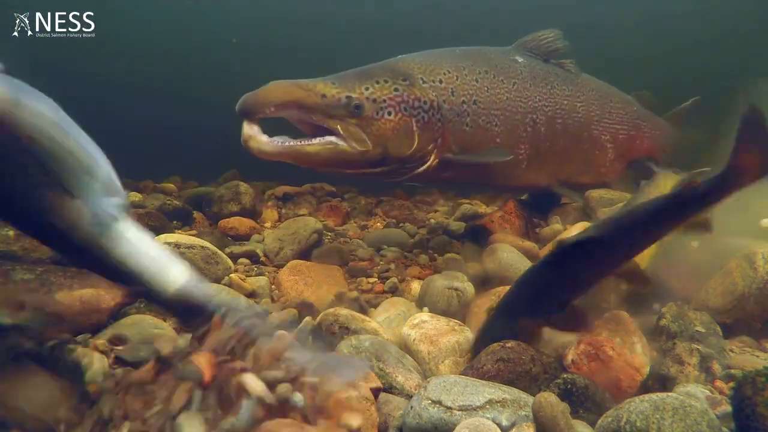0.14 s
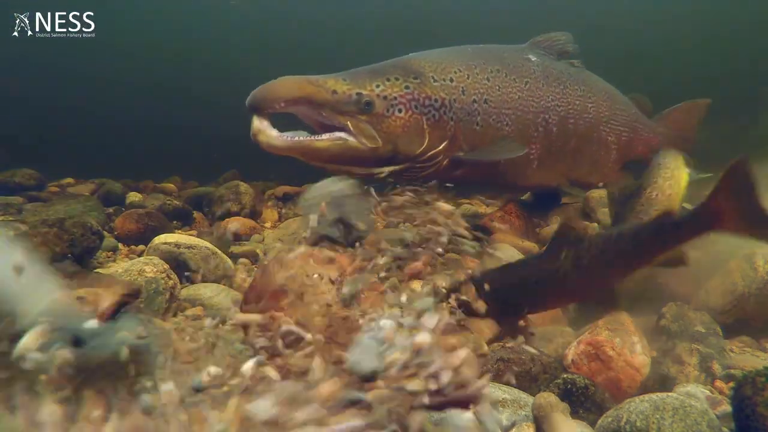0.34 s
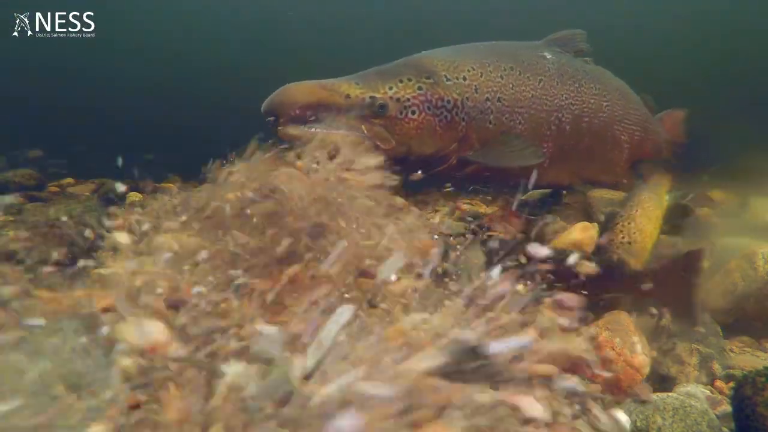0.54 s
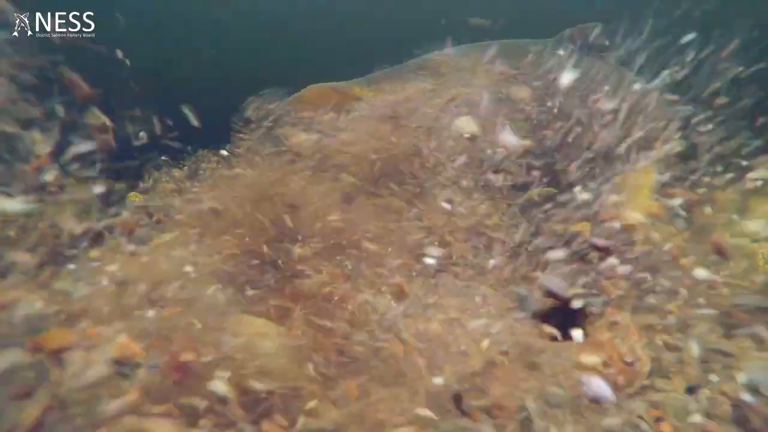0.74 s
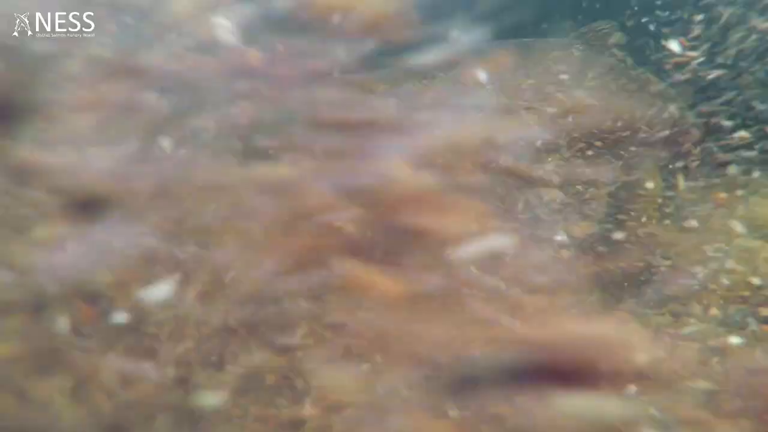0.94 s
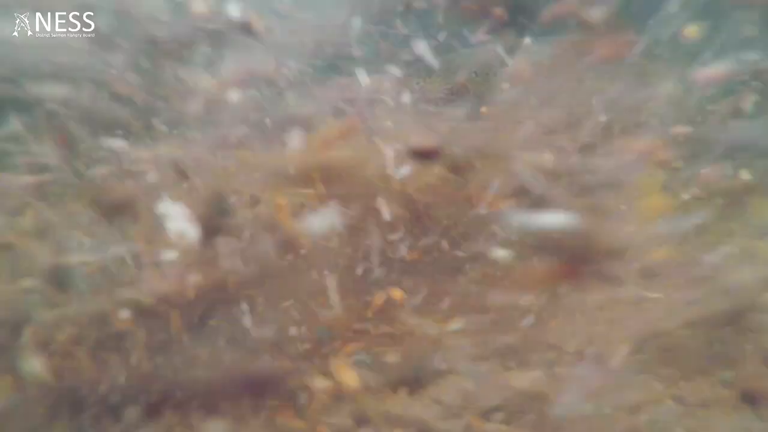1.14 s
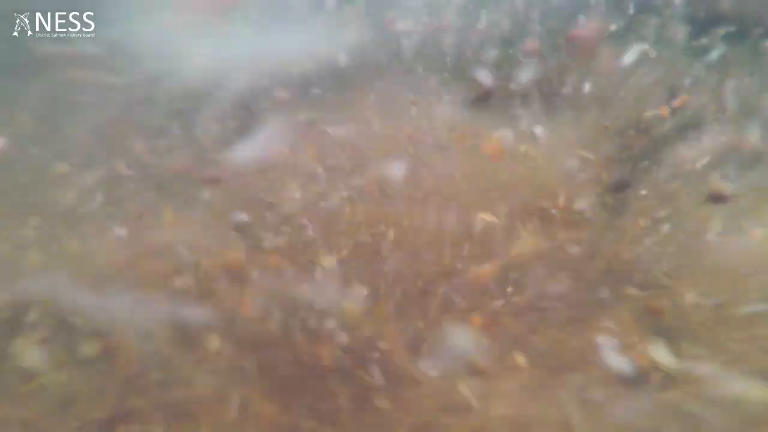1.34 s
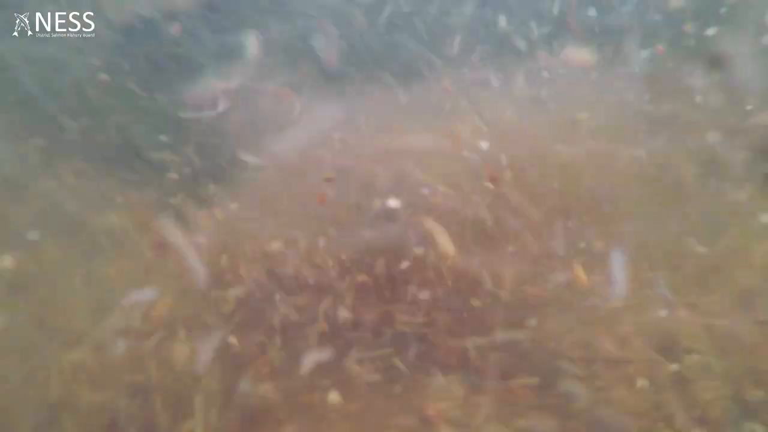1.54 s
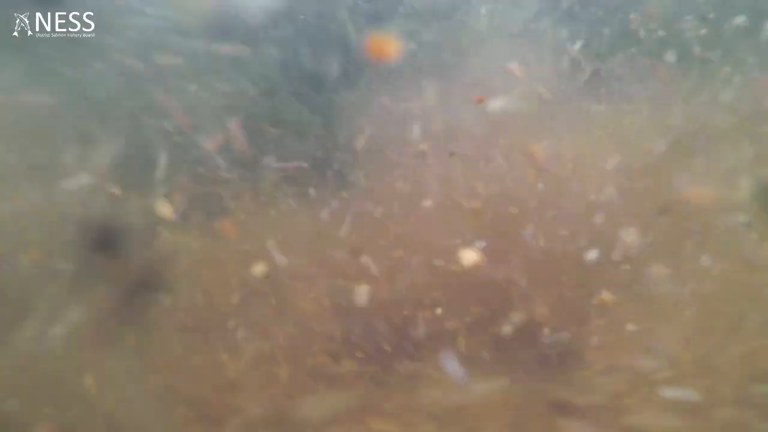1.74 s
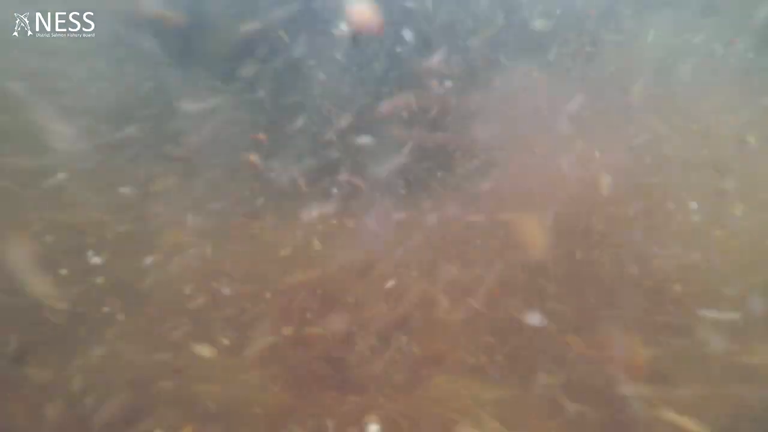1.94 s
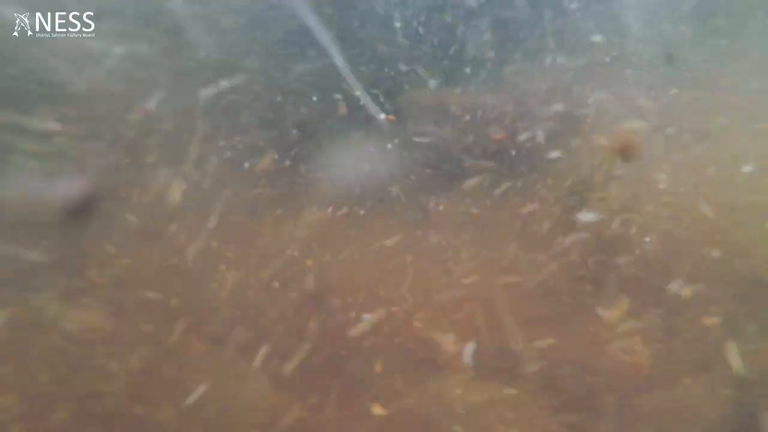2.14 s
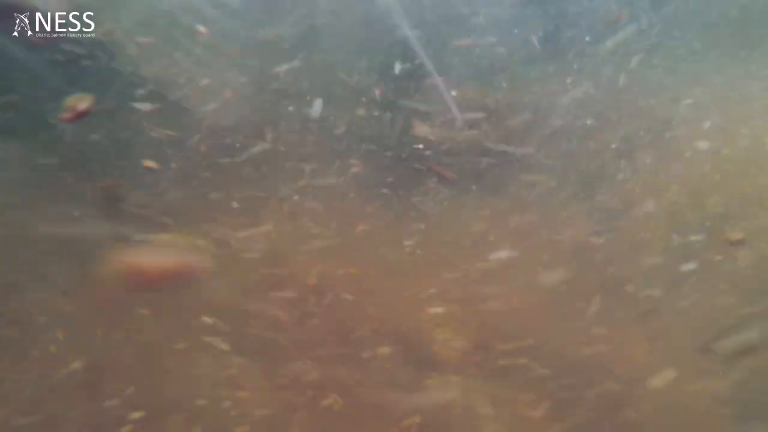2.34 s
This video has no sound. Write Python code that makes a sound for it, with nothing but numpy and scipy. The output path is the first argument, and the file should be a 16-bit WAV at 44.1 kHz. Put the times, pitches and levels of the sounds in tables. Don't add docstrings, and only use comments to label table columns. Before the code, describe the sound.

Stones and grit pelt a small plastic camera case on a riverbed, very close and dry; sharp clicks, hollow knocks and hissing sand build quickly, stay busy, then settle into scattered small taps in murky water.

```python
import sys
import numpy as np
from scipy import signal
from scipy.fft import rfft, irfft, dct
from scipy.io import wavfile
from scipy.ndimage import map_coordinates

SR = 44100
rng = np.random.default_rng(int(sys.argv[2]) if len(sys.argv) > 2 else 0)


def boost_factor(decibels):
    exponent = np.asarray(decibels, float) / 20
    return 10 ** exponent


def output_pcm(signal):
    pcm = np.clip(np.atleast_2d(signal).T, -1, 1) * 32767
    wavfile.write(sys.argv[1], SR, np.round(pcm).astype(np.int16))


N = 105840


def unit(x):
    return x / np.sqrt(np.mean(x ** 2) + 1e-20)


def wobble(knots_per_s):
    knots = rng.standard_normal(int(N * knots_per_s / SR) + 4)
    return map_coordinates(knots, [np.arange(N) * knots_per_s / SR])


def coloured(spectrum):
    f, db = np.transpose(spectrum)
    hz = np.fft.rfftfreq(N, 1 / SR)
    gain = boost_factor(np.interp(np.log(hz + 1), np.log(f + 1), db, right=-120))
    return unit(irfft(rfft(rng.standard_normal(N)) * gain, N))


def placed(times_s, sounds):
    at = np.round(np.asarray(times_s) * SR).astype(int)[:, None] + np.arange(sounds.shape[1])
    return np.bincount(at.ravel(), sounds.ravel(), N + SR)[:N]


def band(x, edges_hz):
    return signal.sosfilt(signal.butter(3, edges_hz, "band", fs=SR, output="sos"), x)


T60_AT_3K_S, T60_SLOPE = .011, .62


def fade(hz, t):
    return -60 * t / T60_AT_3K_S * (hz / 3000) ** T60_SLOPE


SPOT_DB, DETUNE = 3, .025
CRACK, CRACK_S = 3, .0004
SOFT_RISE_S = .00025


def rings(modes, hard, rise_s, size, tilt_db=0):
    t = np.arange(size) / SR
    luck = rng.standard_normal((len(hard), len(modes), 2))
    scatter_db = SPOT_DB * (2.5 - hard / 2)
    out = 0
    for k, (hz, db) in enumerate(modes):
        octaves = np.log2(hz / modes[0][0])
        level_db = db + tilt_db * octaves + scatter_db * luck[:, k, :1] + fade(hz, t)
        pitch_hz = hz * (1 + DETUNE * luck[:, k, 1:])
        out = out + boost_factor(level_db) * np.sin(2 * np.pi * pitch_hz * t)
    swell = 1 - np.exp(-t / (rise_s + SOFT_RISE_S * (1 - hard) ** 2))
    spike = 1 + CRACK * hard * np.exp(-t / CRACK_S)
    out = out * swell * spike
    return out / np.abs(out).max(axis=1, keepdims=True)


# [f/Hz, level/dB]
BODY_MODES = [(1280, -12), (1770, -2), (2200, -4), (2620, 5), (3200, 8), (3950, 1), (4700, 1)]
TREBLE_MODES = [(5520, 2.3), (6600, 6.2), (7200, 5.2), (8900, 6.7), (10100, 11.1), (12300, 12.7),
                (14700, 2.37)]
FRAME_MODES = [(350, -26.5), (520, 6), (640, 3), (780, 7.5)]
BODY_HZ, TREBLE_HZ, FRAME_HZ = (1100, 5600), (4800, 15800), (420, 860)
STONE_RISE_S, KNOCK_RISE_S = .00017, .001
SOFT_DB = -15
SHARPNESS, MURK_DB_PER_S = .5, 6
SHAKE_DB, ROUND_SHAKE_DB = -18.5, 9 + 21


def blows(times_s, db, treble_db):
    share = boost_factor(treble_db)[:, None]
    hard = np.clip(1.5 - treble_db / SOFT_DB, 0, 1)[:, None]
    gain = boost_factor(db)[:, None] / np.sqrt(1 + share ** 2)
    tilt_db = (SHARPNESS * treble_db - MURK_DB_PER_S * times_s)[:, None]
    shake = boost_factor(db[:, None] + SHAKE_DB - 9 * hard)
    body = placed(times_s, gain * rings(BODY_MODES, hard, STONE_RISE_S, size=640))
    top_rings = rings(TREBLE_MODES, hard, STONE_RISE_S, size=400, tilt_db=tilt_db)
    top = placed(times_s, gain * share * top_rings)
    frame = placed(times_s, shake * rings(FRAME_MODES[1:], 0 * hard, KNOCK_RISE_S, size=1300))
    return band(body, BODY_HZ) + band(top, TREBLE_HZ) + band(frame, FRAME_HZ)


# [t/s, grit level/dB, current level/dB]
CLOUD_LEVELS = [(0, -72, -54), (0.097, -70, -54.5), (0.103, -53.5, -49), (.2, -42.5, -47),
                (0.341, -41, -42.5), (.5, -32.5, -39), (.7, -42, -42.5), (1.07, -34, -41.5),
                (1.13, -37, -44.5), (1.45, -30.5, -43), (1.6, -37, -47.5), (1.85, -45, -45.5),
                (1.943, -60, -56), (1.973, -45.5, -83), (2.03, -57.5, -64), (2.4, -56.5, -52)]


def cloud(column):
    rows = np.array(CLOUD_LEVELS)
    return np.interp(np.arange(N) / SR, rows[:, 0], rows[:, column])


# [f/Hz, density/dB]
CURRENT_SPECTRUM = [(20, -18), (50, -6), (80, 4), (130, -0.5), (250, -10.5), (550, -4), (800, -3),
                    (1000, -16.5), (15000, -25)]


def water():
    lumps_db = 2 * wobble(25)
    return boost_factor(cloud(column=2) + lumps_db) * coloured(CURRENT_SPECTRUM)


SAND_DB, SAND_GROWS = -8, .7
SAND_TREBLE_DB, SETTLES_DB_PER_S = 8.5, 8


def hiss(modes):
    t = np.arange(640) / SR
    response = 0
    for k, (hz, db) in enumerate(modes):
        response = response + (-1) ** k * boost_factor(db + fade(hz, t)) * np.sin(2 * np.pi * hz * t)
    return unit(signal.fftconvolve(rng.standard_normal(N), response)[:N])


def sand():
    body, treble = hiss(BODY_MODES), hiss(TREBLE_MODES)
    grit_db = cloud(column=1)
    thick_db = -50 + SAND_GROWS * (grit_db + 52.5)
    level_db = np.minimum(grit_db, thick_db) + SAND_DB + 5.2 * wobble(60)
    fizz_db = SAND_TREBLE_DB - SETTLES_DB_PER_S * np.arange(N) / SR + 0.277 * wobble(29.48)
    return boost_factor(level_db) * (body + boost_factor(fizz_db) * treble)


GRIT_PER_S, GRIT_DB, GRIT_SPREAD_DB = 800, 4, 5
GRIT_TREBLE_DB, GRIT_TREBLE_SPREAD_DB = -14, 11


def grit():
    luck = rng.random((int(GRIT_PER_S * N / SR), 3))
    s = luck[:, 0] * (N - 1) / SR
    size_db = -GRIT_SPREAD_DB * np.log(np.maximum(luck[:, 1], .2))
    db = cloud(column=1)[(s * SR).astype(int)] + GRIT_DB + size_db
    treble_db = GRIT_TREBLE_DB + GRIT_TREBLE_SPREAD_DB * (2 * luck[:, 2] - 1)
    return blows(s, db, treble_db)


# [t/s, peak level/dB, treble over
# body/dB]
STONE_STRIKES = [(0.0023, -52, -18), (0.0081, -44, -17), (0.157, -23, 0.5), (0.2055, -12.5, -2),
                 (0.22, -22.5, -9), (0.2277, -23, -20), (0.2465, -18, -16.5), (0.2555, -22, -1),
                 (0.272, -24, 22), (0.3056, -12, -8), (0.3186, -9, -8.5), (0.3274, -8, -2.5),
                 (0.3373, -12, -8.5), (0.3467, -17.5, -8.5), (0.4058, -18.5, 12), (0.4318, -19.5, 5),
                 (0.4402, -17, 8), (0.4605, -22, 12), (0.4744, -14.5, -11), (0.4883, -17, -7.5),
                 (0.4934, -7, -17.5), (0.5027, -12.5, -5.5), (0.5113, -15.5, -22.5), (0.5295, -8.5, -9.5),
                 (0.5405, -14, 1), (0.551, -12, -6), (0.5588, -20.5, -1), (0.5714, -4, -10.5),
                 (0.5925, -19.5, -18), (0.613, -20.5, -14), (0.6167, -12, -6), (0.6286, -25, 19),
                 (0.6357, -7.5, -7.5), (0.6429, -17, -4), (0.6447, -21, 15), (0.6779, -18, -17),
                 (0.684, -27, -24), (0.6947, -23, 23), (0.7172, -12, -7), (0.7237, -13, -13.5),
                 (0.765, -22, -4), (0.774, -21.5, -8), (0.7779, -15.5, -8), (0.7814, -9, -1),
                 (0.7866, -16, -9), (0.7977, -15, -22), (0.804, -12, -8), (0.8165, -20, -5.5),
                 (0.8282, -12, -3.5), (0.852, -11, -14), (0.8568, -10.5, -12.5), (0.8818, -16, -1),
                 (0.89, -11.5, -17.5), (0.9182, -6.5, -1.5), (0.9235, -11.5, -22), (0.9283, -8.5, -13),
                (0.9673, -9.5, -1), (0.9736, -14.5, -7), (0.9767, -18.5, -1), (1.002, -10, -2),
                (1.0098, -24, -4), (1.0191, -9, -18.5), (1.0308, -14.5, -19), (1.0471, -11.5, -3),
                (1.0568, -17, -17), (1.0681, -20, -12), (1.0767, -12.5, -9), (1.0912, -5, -8.5),
                (1.0985, -18, -20), (1.115, -13.5, -7), (1.1463, -17, -9), (1.1575, -14, -6.5),
                (1.1772, -14.5, -21), (1.1821, -17, -20), (1.2078, -12.5, -10.5), (1.2177, -16.5, -17),
                (1.2289, -14, -23.5), (1.2353, -15.5, -38.5), (1.2418, -19.5, -17), (1.2635, -17.5, -17.5),
                (1.2716, -20.5, 6), (1.2761, -9, -15.5), (1.2924, -13, -11.5), (1.2953, -7, -6.5),
                (1.3047, -8, -15), (1.34, -36, -19), (1.3756, -9.5, -13.5), (1.3939, -13.5, -13),
                (1.3987, -12.5, 0.5), (1.4058, -22.5, -30), (1.4149, -18, -5), (1.4226, -13.5, -13),
                (1.4269, -20.5, -26.5), (1.4378, -27, -17.5), (1.4442, -14.5, -34), (1.4552, -13, -10),
                (1.4735, -11, -2), (1.4802, -15.5, -40), (1.4938, -9, -5), (1.5155, -14, 1),
                (1.535, -26, -6), (1.5487, -18, 9), (1.5651, -16, -16), (1.5712, -17.5, -14),
                 (1.5748, -9.5, 4), (1.6136, -38.5, -11.5), (1.6244, -13, -8), (1.6366, -19.5, -18),
                   (1.6544, -26.5, -25), (1.6785, -13.5, -2), (1.7016, -28, -10), (1.7229, -23, -11),
                   (1.7433, -23, -14), (1.7499, -20.5, -24), (1.7726, -21, -23.5), (1.788, -24.5, -11),
                   (1.8362, -23, -12.5), (1.8489, -12, -7.5), (1.8639, -20.5, 0), (1.8716, -19, -31),
                   (1.8792, -23.5, -15), (1.8886, -22.5, -3), (1.904, -22, -5), (1.9102, -22, -24),
                   (1.9321, -33, 15), (1.9367, -8.5, 0.5), (1.9472, -16.5, -8), (1.9727, -33, -26.5),
                   (2.0041, -18.5, -7), (2.0353, -28, -6), (2.0571, -30, -12), (2.0623, -19, -11),
                   (2.1054, -21, -12), (2.1092, -37, -5), (2.1254, -36, -11), (2.1338, -16.5, 0),
                   (2.1531, -25, -13), (2.1603, -18, -6), (2.165, -30, -12), (2.1698, -28, -15),
                   (2.1733, -28, -9), (2.1876, -21.5, -10.5), (2.2053, -20.5, -4.5), (2.2151, -45, -16),
                   (2.2335, -31.5, -19), (2.2383, -20, -8), (2.2481, -26.5, -2), (2.2641, -34, -12),
                   (2.269, -28, -9), (2.2868, -39.5, -16), (2.2993, -39, -12), (2.325, -25.5, -12),
                   (2.3316, -33, -24.5), (2.3376, -35, -16), (2.372, -39, 1), (2.385, -30.5, -20)]
STONE_DB = 5


def stones():
    s, db, treble_db = np.transpose(STONE_STRIKES)
    return blows(s, db + STONE_DB, treble_db)


# [t/s, peak level/dB, f/Hz]
HEAVY_KNOCKS = [(0.066, -32, 487), (0.105, -34.5, 545), (0.433, -31, 511), (0.474, -27, 720),
                (0.487, -13, 472), (0.543, -17.5, 525), (0.614, -30, 689), (0.64, -22.5, 507),
                (0.678, -28, 729), (0.722, -20.5, 540), (0.756, -22, 566), (0.798, -24.5, 520),
                (0.827, -25.5, 519), (0.857, -19, 528), (0.928, -18.5, 540), (1, -34, 546),
                (1.02, -21, 875), (1.089, -34, 797), (1.114, -22, 760), (1.157, -25, 780),
                (1.208, -19.5, 596), (1.371, -32, 720), (1.414, -24, 583), (1.438, -19, 524),
                (1.466, -20.5, 774), (1.614, -32, 754), (1.935, -28, 880), (2.057, -38.5, 528),
                (2.132, -39, 514), (2.169, -40, 522)]
KNOCK_DB, LEAN_DB = 0.5, 30


def knocks():
    s, db, hz = np.transpose(HEAVY_KNOCKS)[:, :, None]
    tilt_db = LEAN_DB * np.log2(hz / FRAME_MODES[2][0])
    half_hard = np.ones_like(db) / 2
    ringing = rings(FRAME_MODES, half_hard, KNOCK_RISE_S, size=2200, tilt_db=tilt_db)
    return placed(s[:, 0], boost_factor(db + KNOCK_DB) * ringing)


# [t/s, peak level/dB, f/Hz]
EDDY_SHOVES = [
    (0.427, -31.5, 70.0),
    (0.488, -15.5, 83),
    (0.529, -24.5, 110),
    (0.585, -22, 71.6),
    (0.743, -27.5, 109),
    (0.83, -24, 101),
    (1.031, -35.5, 73),
    (1.271, -32, 76),
    (1.676, -33, 74),
]
SHOVE_T60_S, SHOVE_RISE_S = .11, .006


def shoves():
    s, db, hz = np.transpose(EDDY_SHOVES)[:, :, None]
    t = np.arange(SR // 6) / SR
    envelope = boost_factor(db - 60 * t / SHOVE_T60_S) * (1 - np.exp(-t / SHOVE_RISE_S))
    return placed(s[:, 0], envelope * np.sin(2 * np.pi * hz * t))


# [t/s, peak level/dB, f/Hz]
ROUND_PEBBLES = [
    (0.496, -3.5, 1840),
    (0.722, -4.5, 4620),
    (0.931, -7.5, 1580),
    (1.116, -8, 1505),
    (1.158, -7, 1440),
    (1.303, -11, 1490),
    (1.423, -9, 1410),
    (1.9367, 0.5, 7040),
]
PEBBLE_CYCLES = 22


def pebbles():
    s, db, hz = np.transpose(ROUND_PEBBLES)[:, :, None]
    cycles = hz * np.arange(900) / SR
    envelope = boost_factor(db - 60 * cycles / PEBBLE_CYCLES) * (1 - np.exp(-cycles))
    return placed(s[:, 0], envelope * np.sin(2 * np.pi * cycles))


def scene():
    return (stones() + pebbles() + grit() + sand() + knocks() + shoves() + water())[None]


# [t/s, coarseness over mean line level/dB]
BLURS = [
    (.346, 11.5),
    (0.392, 10.5),
    (0.512, 6.5),
    (0.906, 6.5),
    (1.978, 13.5),
    (2.11, 8.5),
]
BLUR_S, FINER_TREBLE = .04, 8


def blurred(x):
    s, db = np.transpose(BLURS)[:, :, None]
    size = round(BLUR_S * SR)
    at = np.round(s * SR).astype(int) - size // 2 + np.arange(size)
    window = np.sqrt(signal.windows.tukey(size, .6))
    lines = dct(x[at] * window, norm="ortho")
    mean_line = np.sqrt(np.mean(lines ** 2, axis=1, keepdims=True))
    step = boost_factor(db) * mean_line / np.sqrt(1 + np.linspace(0, FINER_TREBLE, size))
    error = np.round(lines / step) * step - lines
    return x + placed(at[:, 0] / SR, dct(error, type=3, norm="ortho") * window)


def low_pass(x):
    return signal.sosfilt(signal.butter(12, 16490, fs=SR, output="sos"), x)


TOP_HZ = 15300


def record(dry):
    hz = np.fft.rfftfreq(N, 1 / SR)
    passed = 1 / np.sqrt(1 + (hz / TOP_HZ) ** 70)
    held = dry / (1 + np.abs(dry) ** 8) ** (1 / 8)
    limited = irfft(rfft(held) * passed, N)[0]
    mix = blurred(limited)[None]
    return low_pass(mix)


dry = scene()
out = record(dry)
output_pcm(out)
```